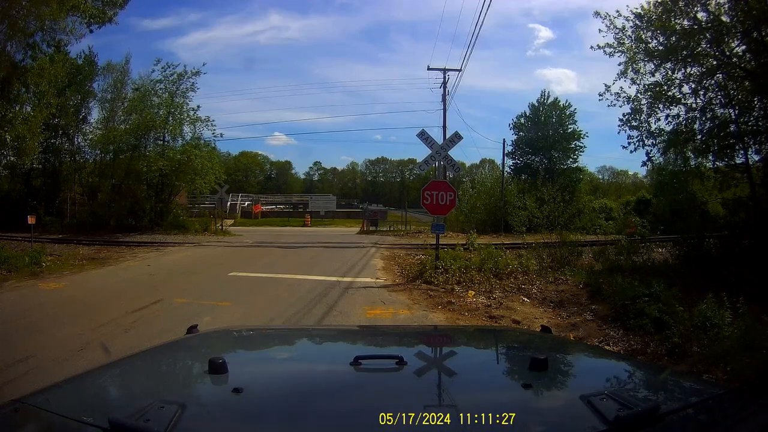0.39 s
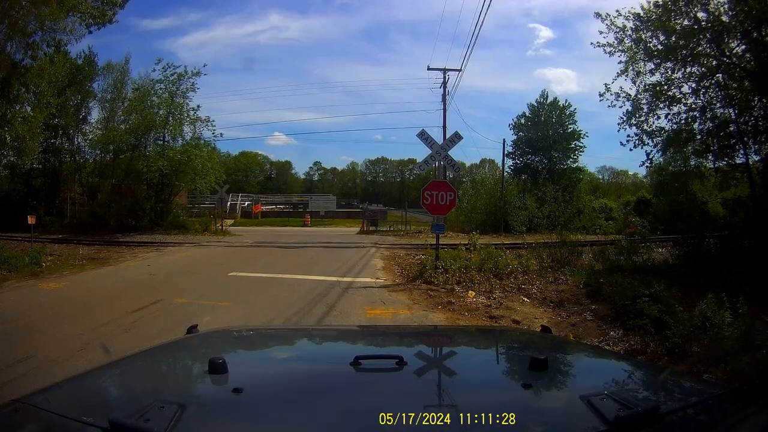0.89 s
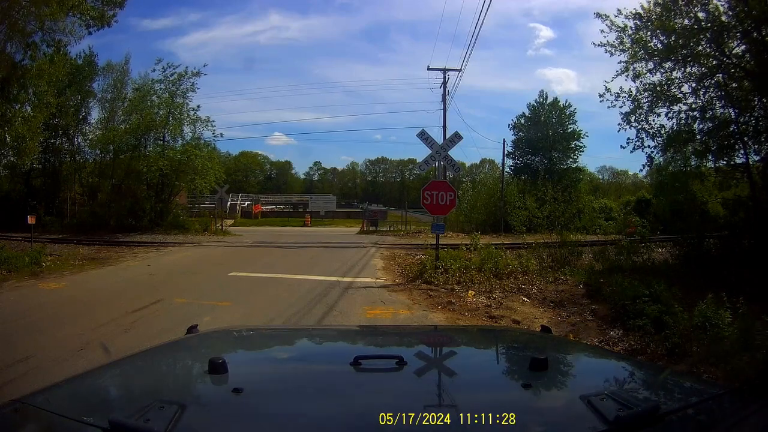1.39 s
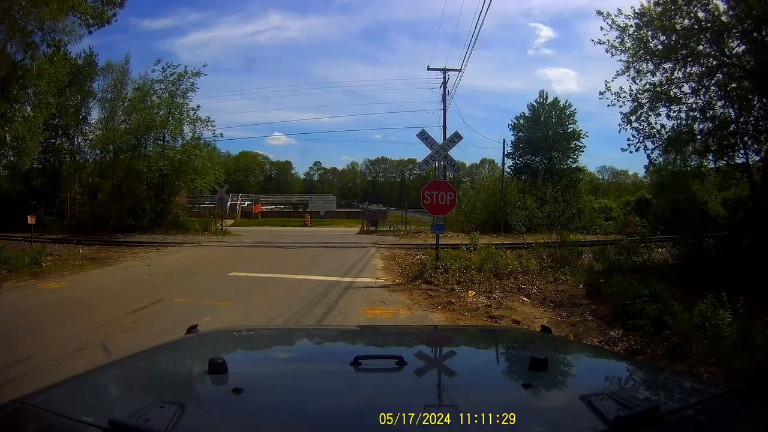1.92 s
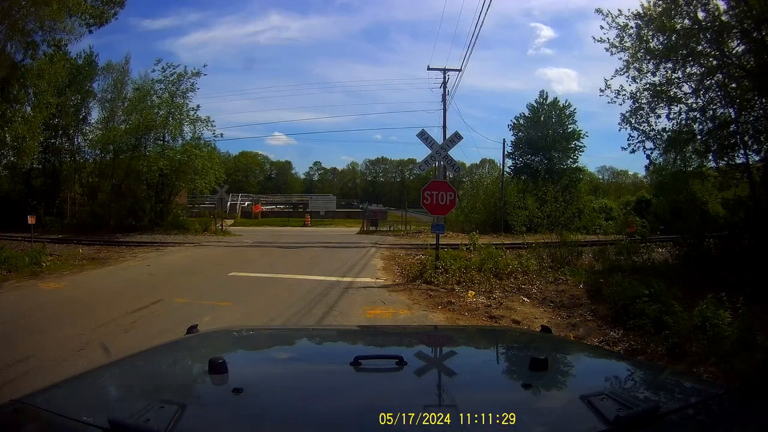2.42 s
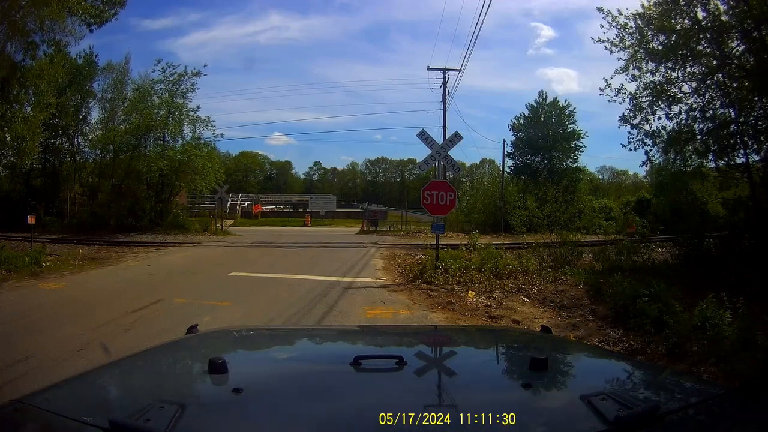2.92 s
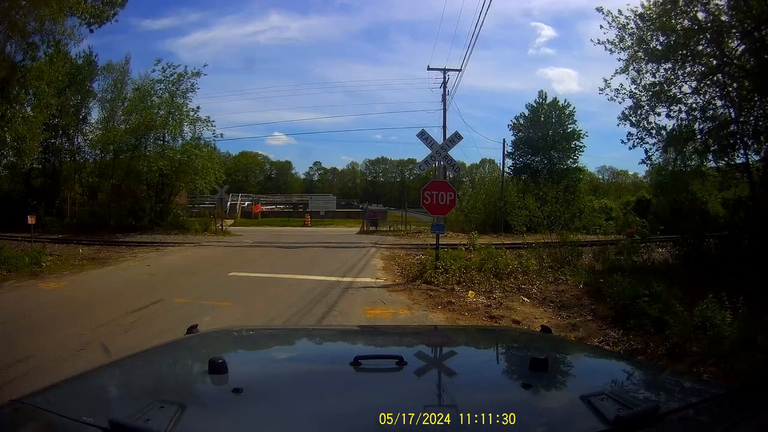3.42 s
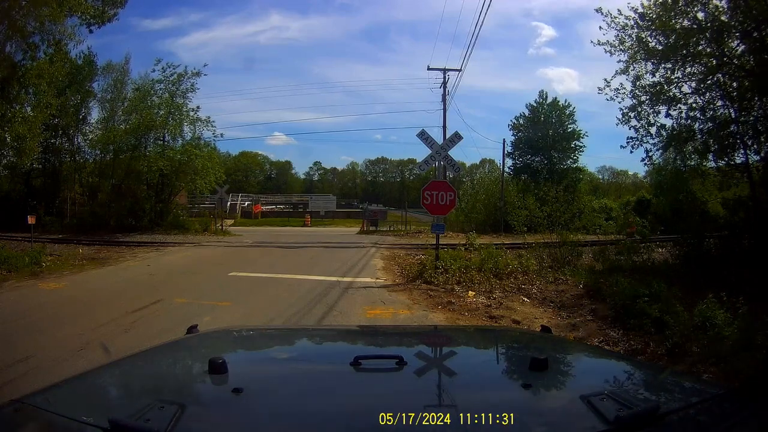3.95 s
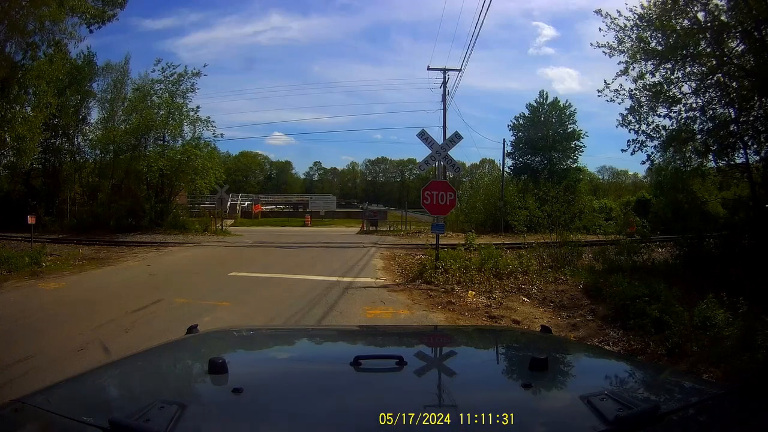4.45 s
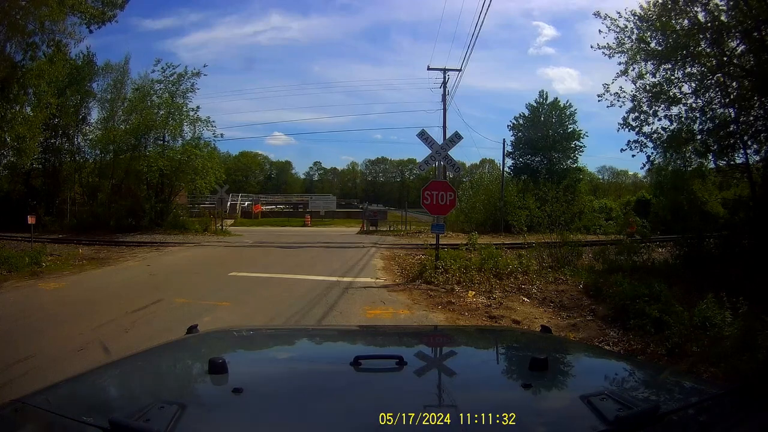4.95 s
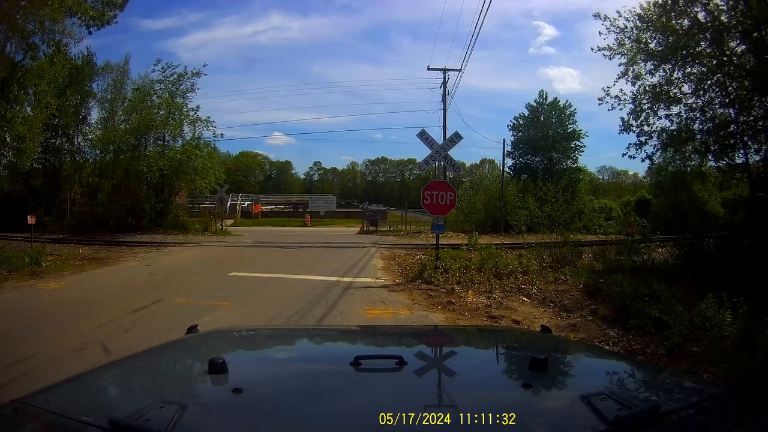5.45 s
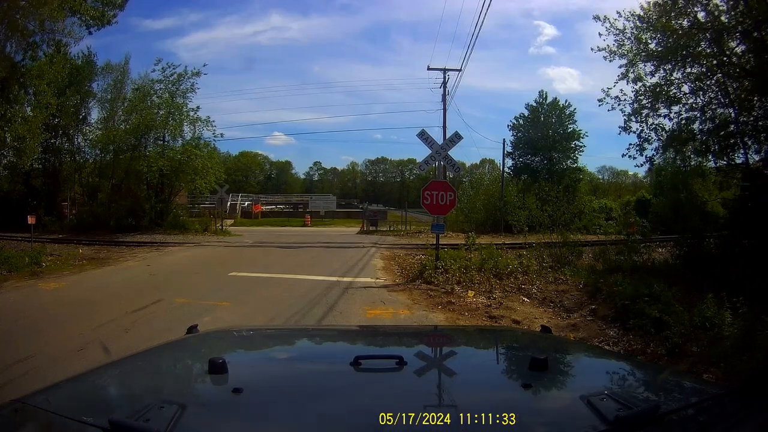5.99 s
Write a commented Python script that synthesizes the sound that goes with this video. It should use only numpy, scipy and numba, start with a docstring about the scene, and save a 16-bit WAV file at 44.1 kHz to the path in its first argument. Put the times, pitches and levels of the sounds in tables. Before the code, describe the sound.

At a rural level crossing, heard from inside a waiting car, the echo of an earlier train horn dies away among trees. A bell rings faintly twice over a low diesel throb and slowly growing rumble. Then a loud five-note air horn blares one long, shimmering chord, sags and chokes off, leaving a flatter echo in the woods. One hissing microphone, sound only on the left.

```python
"""First an earlier horn blast dies away in the woods: its sound comes back as delayed copies off the trees.
A slow diesel locomotive nears the level crossing, throbbing in multiples of its crank speed over filtered-noise
rumble; a bell, decaying sines, rings faintly twice. At 2.3 s the five-bell air horn blows a long blast of
harmonics and rushing air, echoed flatter in pitch from behind the train, and chokes off after 5 s.
It is heard from a waiting car; one hissing microphone feeds the left channel through a limiter."""
import sys
import numpy as np
from scipy import signal
from scipy.fft import rfft, irfft, next_fast_len
from scipy.io import wavfile
from scipy.ndimage import uniform_filter1d, minimum_filter1d
from numba import njit

SR = 44100
rng = np.random.default_rng(int(sys.argv[2]) if len(sys.argv) > 2 else 0)


def put_to_file(sound):
    """Save the sound as 16-bit audio at rate SR, in the file named by the first command-line argument."""
    columns = np.atleast_2d(sound).T  # one column per channel
    safe = np.clip(columns, -1, 1)
    whole_steps = np.round(safe * 32767)
    wavfile.write(sys.argv[1], SR, whole_steps.astype(np.int16))


def convert_level_to_amplitude(level_db):
    """Map a level in decibels to its linear amplitude factor."""
    exponent = np.asarray(level_db, float) / 20
    return 10 ** exponent


N = 269010
TIME = np.arange(N) / SR
HORN_SR = SR / 2  # the horn is built at half rate
LEAD_S, SPEAKS_S = 3, 2.296  # horn history kept from before the start; moment the blast speaks


def noise(points, size=N, rate=SR):
    """Noise of rms 1 with its spectrum drawn through (f/Hz, level/dB) points."""
    hz, db = np.transpose(points)
    fast = next_fast_len(size)
    f = np.maximum(np.arange(fast // 2 + 1) * rate / fast, 1)
    curve_db = np.interp(np.log(f), np.log(hz), db, -90, -90)
    x = irfft(rfft(rng.standard_normal(fast)) * convert_level_to_amplitude(curve_db), fast)
    return x[:size] / x.std()


def walk(rate, t=TIME):
    """Random levels of rms about 1, rate a second, joined by straight lines."""
    count = int((t[-1] - t[0]) * rate) + 2
    return np.interp(t, t[0] + np.arange(count) / rate, 1.19 * rng.standard_normal(count))


def steepen(x):
    """So loud a wave bends on its way: squaring it adds sum tones of the bells."""
    highpass = signal.butter(4, 700, "high", fs=HORN_SR, output="sos")
    bent = signal.sosfilt(highpass, x ** 2)
    return x + convert_level_to_amplitude(-30) * bent * x.std() / bent.std()


# horn partials above the sixth, through the car's glass: f/Hz, level/dB
HORN_TREBLE = [(2100, -6), (2700, -6), (3300, -6.5), (3620, -3), (4300, -8.5), (5000, -18), (5900, -15),
               (6600, -25), (7500, -22.5), (9000, -32), (10500, -39)]


def high_partials(hz):
    """Multiples of a bell's pitch above the sixth, each with its level in dB."""
    k = np.arange(7, int(HORN_TREBLE[-1][0] / hz))
    f, db = np.transpose(HORN_TREBLE)
    return zip(k, np.interp(np.log(k * hz), np.log(f), db))


# the five horn bells: pitch f/Hz, strongest forward partial, readiness to sharpen as the valve closes
HORN_BELLS = [(326.6, 3, .4), (401.5, 2, .6), (440.0, 1, 1), (520.0, 2, .6), (653.2, 1, 2.5)]
# low partials, one list a bell: partial number, level/dB straight ahead, level/dB to the sides and back
BELL_PARTIALS = [
    [(1, -35.5, -38.5), (2, -48.5, -40.5), (3, -30.5, -38.5), (4, -56.5, -50.5), (5, -57.5, -48),
     (6, -55.5, -56.5)],
    [(1, -46, -33.5), (2, -27, -36), (3, -37, -39), (4, -49.5, -50.5), (5, -63, -71), (6, -69, -70)],
    [(1, -26.5, -33.5), (2, -40.5, -39), (3, -44.5, -46), (4, -59, -57), (5, -62.5, -68), (6, -85, -77)],
    [(1, -36, -34), (2, -36.5, -38.5), (3, -50, -52.5), (4, -72, -83.5), (5, -69.5, -74.5), (6, -72, -75.5)],
    [(1, -32, -31), (2, -41.5, -43), (3, -49, -57), (4, -66, -76), (5, -66, -79), (6, -74.5, -74)],
]
# brightness of each bell above its sixth partial: level/dB
BELL_BRIGHTNESS = [0.3, 3, -0.5, -0.5, -4]
# how hard each bell falls: level/dB lost for each dB the treble is short of its loudest
BELL_THIRST = [1.254, 0.74, 0.89, 0.98, 0.43]
# how long after the first each bell speaks: t/s
BELL_LATENESS = [0, .03, 0.033, .045, 0]
# swells and dips of single bells on the straight path, one list a bell: t/s, half width t/s, level/dB
BELL_SWELLS = [
    [(3.15, .3, 2.5), (4.05, .2, 1.5), (4.72, .12, -3)],
    [(2.7, .1, 3), (4.25, .4, 7), (5.17, .08, 4)],
    [(2.48, .05, 4.5), (2.85, .12, 4.5), (3.7, .2, 6.5), (4.72, .15, 7)],
    [(3.15, .12, 4), (3.7, .15, -9), (4.2, .08, -8.5), (4.7, .25, 8)],
    [(2.45, .1, 4.5), (3.4, .1, 0), (3.62, .1, -6), (4.2, .1, 1), (4.65, .1, -18.5), (4.93, .07, 2.5),
     (5.5, .12, -9)],
]
# the blast before, as the trees hear it: t/s, level/dB
EARLIER_BLAST = [(-3.0, -3), (-1.3, -3), (-.8, -30), (-.7, -90)]
# air let into the horn: t/s, treble level/dB straight ahead, whole-horn level/dB as the trees hear it
HORN_AIR = [(2.29, -89, -89.5), (2.32, -73.5, -8.5), (2.36, -69, -4.5), (2.47, -62.5, -3), (2.7, -57, -1.5),
            (3.3, -54.5, -1), (4.0, -54, -1), (4.8, -53.5, -2), (4.95, -56.5, -1), (5.12, -62, -11),
            (5.25, -68.5, -16.5), (5.42, -76, -31.5), (5.55, -85, -59), (5.75, -110, -90)]


def horn():
    """Air pressure drives five bells, each a stack of harmonics: straight ahead, and sideways for the trees."""
    t = np.arange(-LEAD_S * SR // 2, N // 2 + 2) * 2 / SR
    air_s, treble_db, open_db = np.transpose(HORN_AIR)
    on = (t > 2.29) & (t < 5.8)
    t_on = t[on]
    top_db = np.interp(t_on, air_s, treble_db)
    valve = convert_level_to_amplitude(np.interp(t, *np.transpose(EARLIER_BLAST + list(zip(air_s, open_db)))))

    # low air pressure sharpens the bells
    start_percent, settle_s = 2.1, .2
    closes_s, end_percent_per_s = 4.78, 2.6
    start_sharp = start_percent * np.exp(-np.abs(t - air_s[0]) / settle_s)
    end_sharp = end_percent_per_s * np.clip(t - closes_s, 0, .55)
    sharp = (t > 2) * (start_sharp + end_sharp) / 100

    short_db = top_db.max() - top_db
    # beyond 20 dB short, every bell chokes by one more dB for each dB
    choke_db = np.maximum(short_db - 20, 0)
    # weak blowing sounds dull: tilt per partial away from the strongest
    dull_db = 0.61 * np.minimum(short_db, 19)

    # the lowest tone throbs for a while
    beat_from_s, beat_to_s, beat_hz, beat_depth = 3.3, 4.5, 4.7, 0.51
    inside_s = np.minimum(t_on - beat_from_s, beat_to_s - t_on)
    beating = beat_depth * np.clip(inside_s / 0.098 + 1, 0, 1)
    bass_beat = np.abs(1 + beating * np.exp(2j * np.pi * beat_hz * (t_on - beat_from_s)))

    straight, side = np.zeros((2, len(t)))
    for (hz, main, ready), rows, thirst, swells, late_s, bright_db in zip(
            HORN_BELLS, BELL_PARTIALS, BELL_THIRST, BELL_SWELLS, BELL_LATENESS, BELL_BRIGHTNESS):
        db = -thirst * short_db - choke_db
        swell_db = 2.5 * walk(12, t_on)  # shimmer
        for at_s, wide_s, size_db in swells:
            swell_db += size_db * np.exp(-((t_on - at_s) / wide_s) ** 2)
        flutter = 0.00038 * walk(25, t) + 0.00208 * walk(150, t)  # the diaphragm beats a little unevenly
        pitch = hz * (1 + np.where(t > 4, ready, 1) * sharp + flutter)
        turn = np.exp(2j * np.pi * np.cumsum(pitch) / HORN_SR)
        # silent for two seconds before it speaks; each further turn makes the next partial
        speaking = np.clip((np.abs(t - air_s[0] - late_s + 1) - 1) / 0.017, 0, 1)
        power = turn * speaking
        for k, ahead_db, side_db in rows:
            wave = np.sqrt(2) * (power * np.exp(2j * np.pi * rng.random())).imag
            power = power * turn
            side += convert_level_to_amplitude(side_db) * wave
            lowest = k * hz == HORN_BELLS[0][0]
            fade_db = (main - k) * dull_db
            if k != main and not lowest:
                # warm air over the track makes each partial fade by itself
                fade_db = fade_db + 3 * walk(3.717, t_on)
            # half of a swell (in dB) spills to the other partials of its bell
            swell = bass_beat if lowest else convert_level_to_amplitude(swell_db * (1 if k == main else .5))
            straight[on] += convert_level_to_amplitude(db + ahead_db + fade_db) * swell * wave[on]

        power, turn = power[on], turn[on]
        for k, high_db in high_partials(hz):
            wave = (power * np.exp(2j * np.pi * rng.random())).imag
            power = power * turn
            side[on] += convert_level_to_amplitude(high_db - 67) * wave
            # the lines sink into the haze octave by octave
            line_db = -6.5 - 2.5 * np.log2(k * hz / 2000) + 3.5 * walk(6, t_on)
            straight[on] += convert_level_to_amplitude(top_db + high_db + bright_db + line_db) * wave

    straight = steepen(straight * np.clip((t - SPEAKS_S) / 0.016, 0, 1))
    # rushing air: a haze between the partials
    straight[on] += convert_level_to_amplitude(top_db - 6.5) * noise(HORN_TREBLE, on.sum(), HORN_SR)
    air = noise([(250, -15.5), (500, -13.5), (900, 0.0), (1300, -3.5), (1600, -8.5), (2100, -21),
                 (3000, -39.5)], len(t), HORN_SR)
    return straight + convert_level_to_amplitude(-42) * valve ** 1.4 * air, steepen(valve * side)


@njit
def scatter(x, start, speed, gain, size):
    """Sums echoes: copies of x, each read from its own start at its own speed."""
    out = np.zeros(size)
    for k in range(len(start)):
        for i in range(size):
            p = start[k] + i * speed[k]
            j = int(p)
            if j >= 0:
                out[i] += gain[k] * (x[j] + (p - j) * (x[j + 1] - x[j]))
    return out


# near and far trees: first delay t/s, last delay t/s, decay by 60 dB t/s, level/dB, dull above f/Hz
WOODS_DEPTHS = [(.01, 1.2, 1.87, 0.27, 3970), (.4, 4.0, 4.89, -12, 1500)]


def woods(side, count=90):
    """Trees at every bearing: the further behind the train, the flatter the echo; far ones are faint and dull."""
    flattest = .022  # share by which an echo from right behind the train is flat
    out = 0
    for first, last, t60, db, dull_hz in WOODS_DEPTHS:
        place, bearing, sign = rng.random((count, 3)).T
        delay = first + (last - first) * (np.arange(count) + place) / count
        speed = 1 - flattest * (1 - np.cos(np.pi * bearing)) / 2
        gain = convert_level_to_amplitude(-60 * delay / t60) * np.sign(sign - .5)
        gain *= convert_level_to_amplitude(db) / np.sqrt(np.sum(gain ** 2))
        # each slowed copy keeps its own delay at the moment the blast speaks
        start = (LEAD_S - delay + SPEAKS_S * (1 - speed)) * HORN_SR
        dull = signal.lfilter(*signal.butter(1, dull_hz, fs=HORN_SR), side)
        out = out + scatter(dull, start, speed, gain, N // 2)
    return out


# engine throb: multiple of crank speed, level/dB
ENGINE_ORDERS = [(3, -63.5), (4, -68.5), (5, -53), (6, -66), (7, -57.5), (8, -66), (9, -65), (10, -70.5),
                 (11, -65), (12, -75), (13, -60.5), (14, -70.5), (15, -74), (16, -59.5)]


def engine():
    """Multiples of the slow crank throb and swell as the train nears; the fifth is the steadiest."""
    crank_hz = 4.4
    turn = 2 * np.pi * np.cumsum(crank_hz * (1 + 0.0015 * walk(1.5))) / SR
    near_db = 0.83 * (TIME - TIME.mean())  # growth each second
    throb = 0
    for k, db in ENGINE_ORDERS:
        nearing, sway_db = (.2, 1.2) if k == 5 else (1, 3)
        level = convert_level_to_amplitude(db + nearing * near_db + sway_db * walk(3.6))
        throb = throb + np.sqrt(2) * level * np.sin(k * turn + 2 * np.pi * rng.random())
    return throb


# bell modes: f/Hz, decay by 60 dB t/s, level/dB
BELL_MODES = [(1913, 0.55, 5), (1902, .6, -1), (3400, 0.45, -8)]
# bell strikes: t/s, level/dB
BELL_STRIKES = [(.54, -65), (1.26, -78)]


def bell():
    """Far strikes ring as decaying modes, their attack smeared by the trees."""
    out = 0
    for strike_s, db in BELL_STRIKES:
        t = np.maximum(TIME - strike_s, 0)
        attack = 1 - np.exp(-(t / 0.067) ** 2)
        for hz, t60, mode_db in BELL_MODES:
            out = out + convert_level_to_amplitude(db + mode_db - 60 * t / t60) * attack * np.sin(2 * np.pi * hz * t)
    return out


# rumble spectrum: f/Hz, level/dB per Hz
RUMBLE_SPECTRUM = [(15, -9), (40, -1), (80, -9.5), (100, -7.5), (150, -11), (280, -13.5), (500, -19.5),
                   (1000, -21.5), (1500, -27), (2000, -41.5), (2500, -45)]


def rumble():
    """Broad noise of wheels and fans, growing by 1.42 dB each second with a slight sway."""
    return convert_level_to_amplitude(-59.5 + 1.42 * TIME + 0.37 * walk(5.0)) * noise(RUMBLE_SPECTRUM)


def scene():
    """Everything at the windscreen, the same for both ears."""
    straight, side = horn()
    blast = straight[-N // 2 - 2:-2] + woods(side)
    blast = signal.resample_poly(blast, 2, 1, padtype="antireflect")
    return np.ones((2, 1)) * (blast + engine() + bell() + rumble())


def top_cut(x):
    """Nothing passes above the cut-off."""
    return signal.sosfilt(signal.butter(12, 15740, fs=SR, output="sos"), x)


# microphone hiss spectrum: f/Hz, level/dB per Hz
HISS_SPECTRUM = [(30, -5.5), (2000, 1.5), (8000, -4), (15500, -3)]


def record(dry):
    """A single hissing microphone goes through a limiter to the left channel; the right is left empty."""
    mono = dry.sum(0) + convert_level_to_amplitude(-69 + 0.55 * walk(11)) * noise(HISS_SPECTRUM)
    ceiling, hold = .85, 2000  # limiter: peak, samples
    room = np.minimum(1, ceiling / (np.abs(mono) + 1e-9))
    mono = mono * uniform_filter1d(minimum_filter1d(room, hold), hold)
    return top_cut(np.array([mono, 0 * mono]))


dry = scene()
out = record(dry)
put_to_file(out)
```